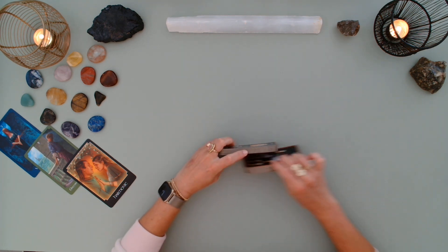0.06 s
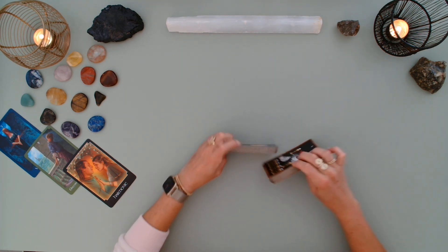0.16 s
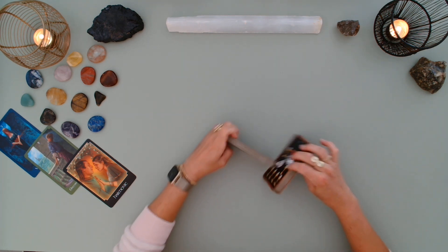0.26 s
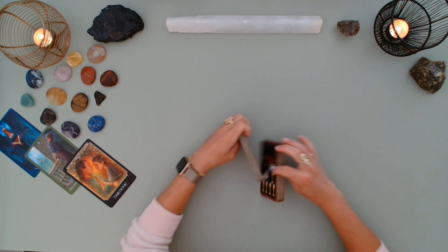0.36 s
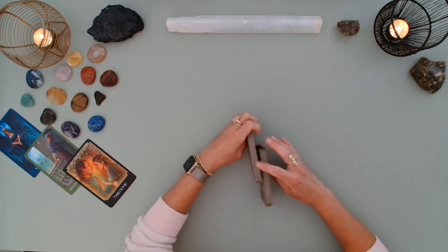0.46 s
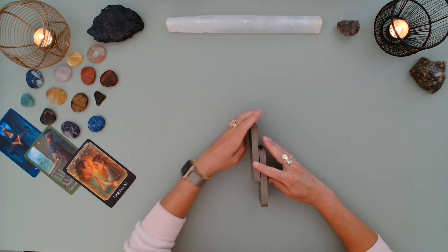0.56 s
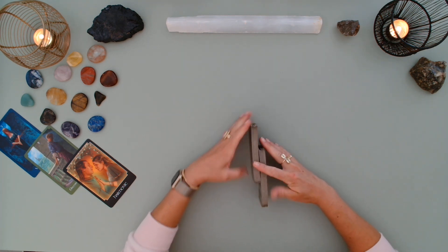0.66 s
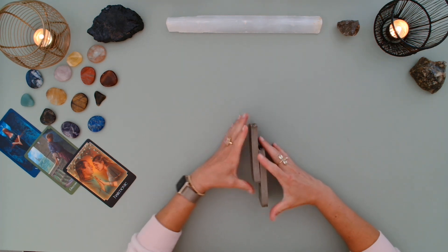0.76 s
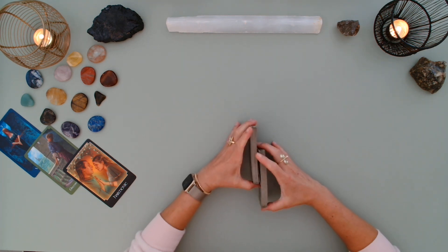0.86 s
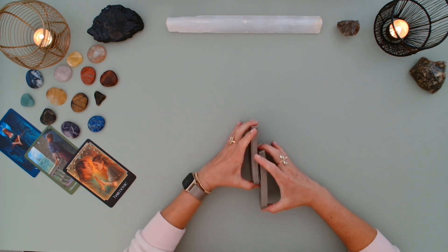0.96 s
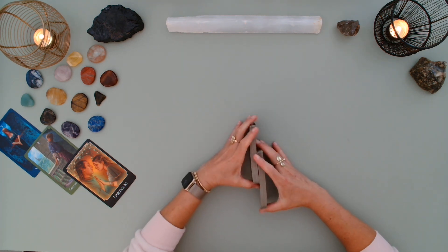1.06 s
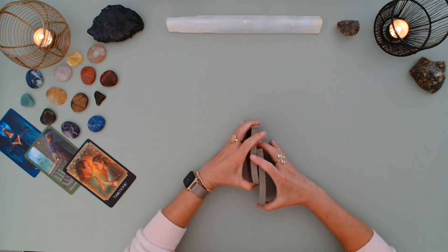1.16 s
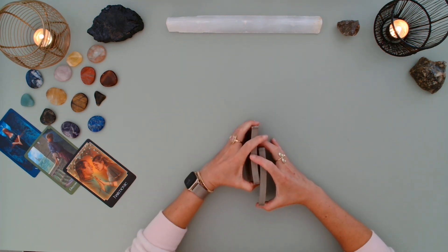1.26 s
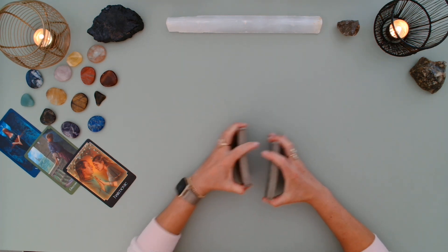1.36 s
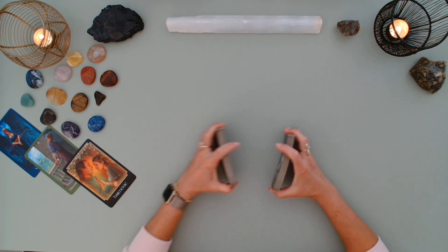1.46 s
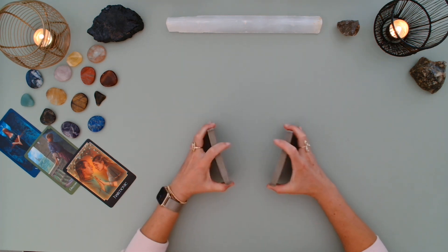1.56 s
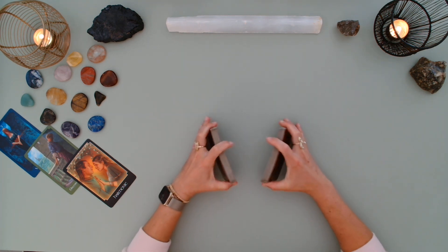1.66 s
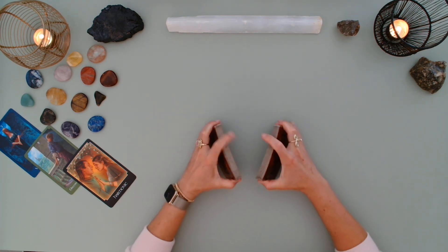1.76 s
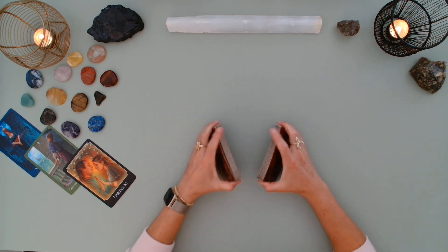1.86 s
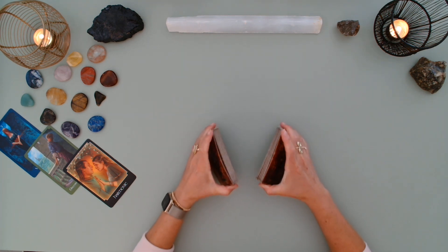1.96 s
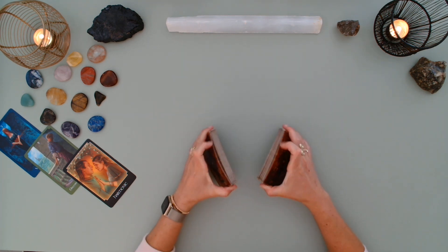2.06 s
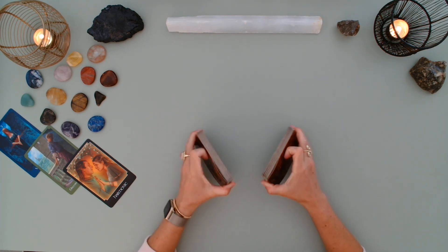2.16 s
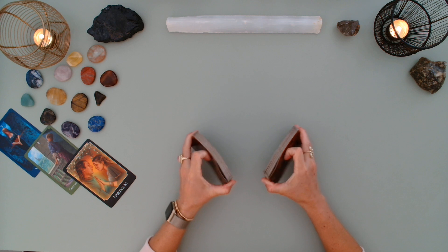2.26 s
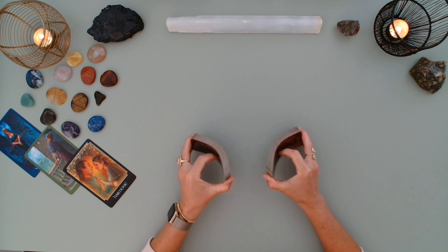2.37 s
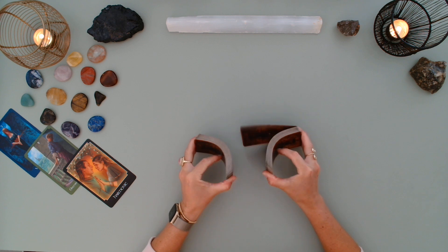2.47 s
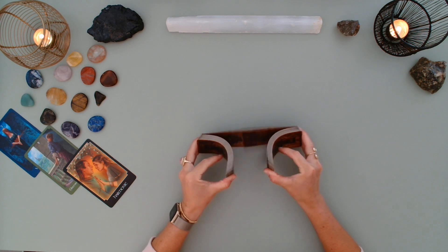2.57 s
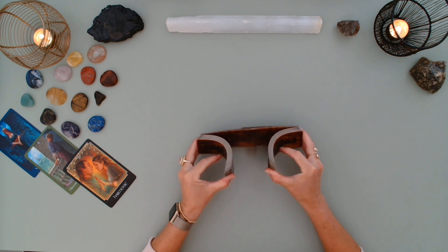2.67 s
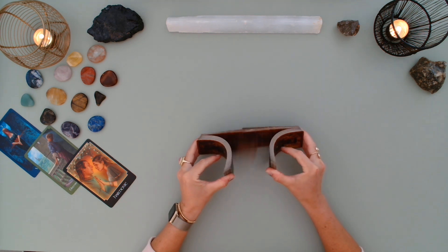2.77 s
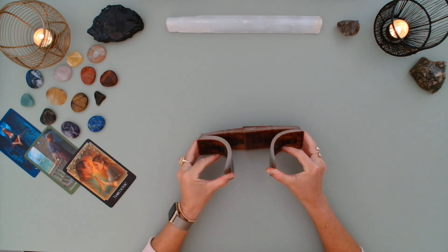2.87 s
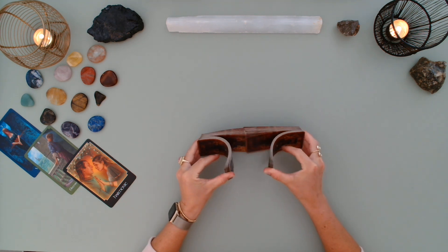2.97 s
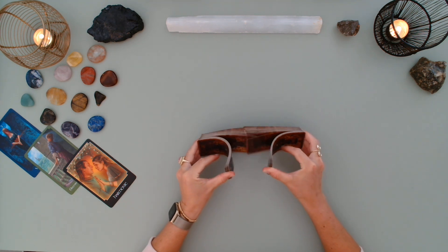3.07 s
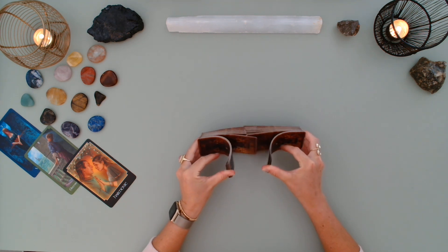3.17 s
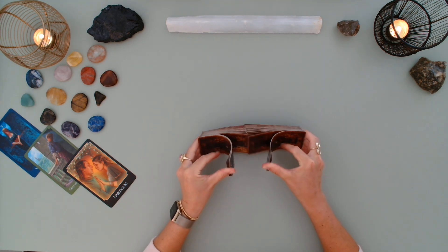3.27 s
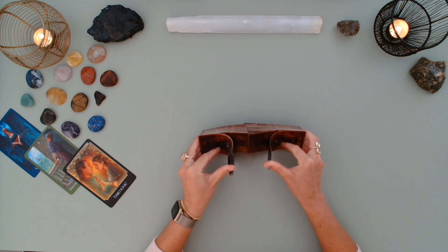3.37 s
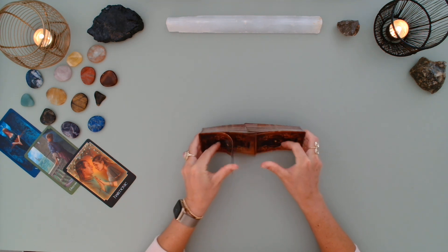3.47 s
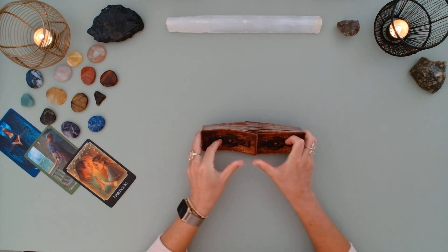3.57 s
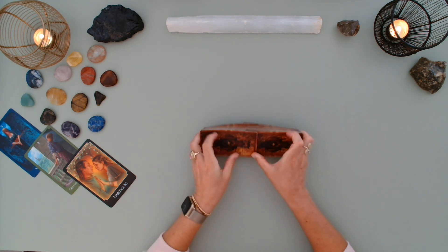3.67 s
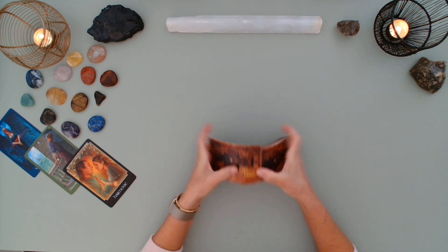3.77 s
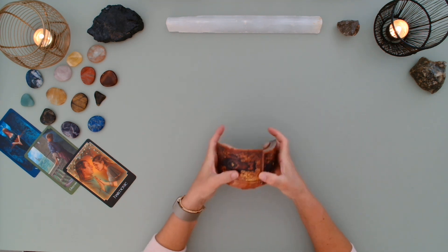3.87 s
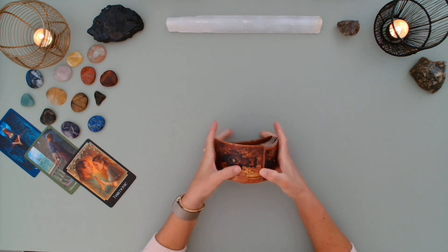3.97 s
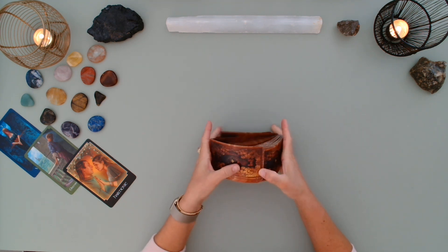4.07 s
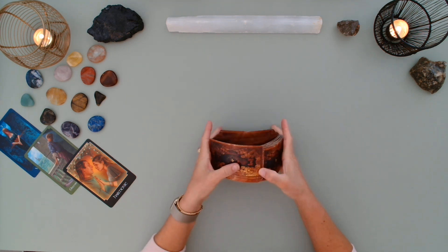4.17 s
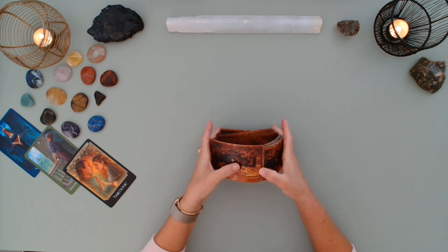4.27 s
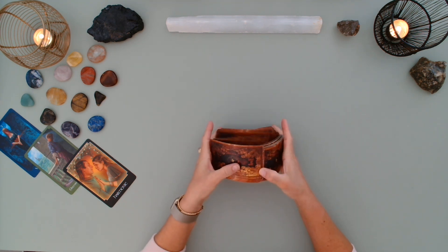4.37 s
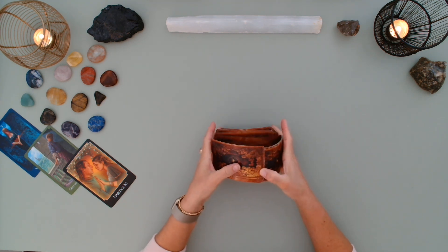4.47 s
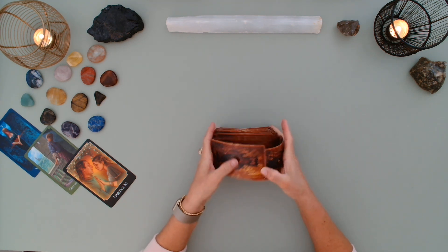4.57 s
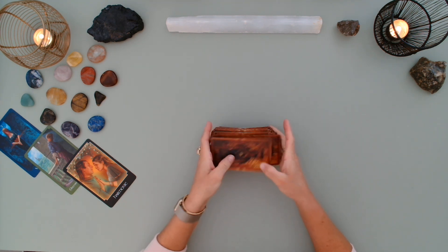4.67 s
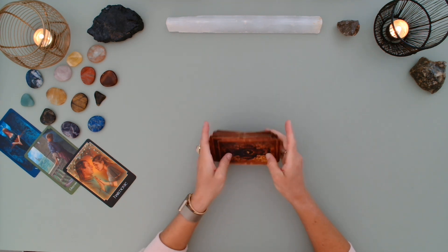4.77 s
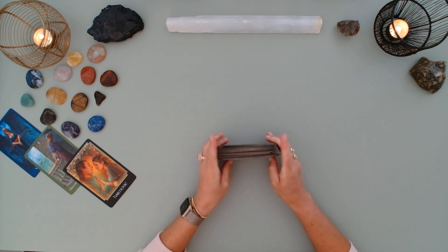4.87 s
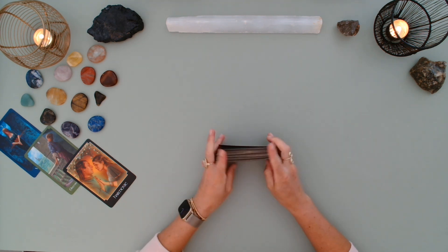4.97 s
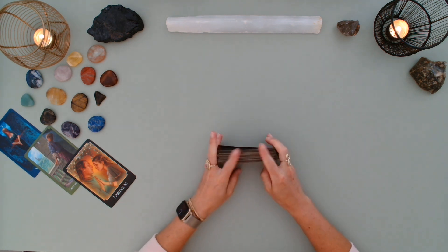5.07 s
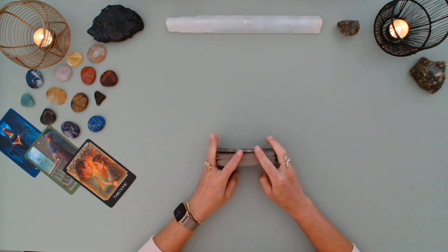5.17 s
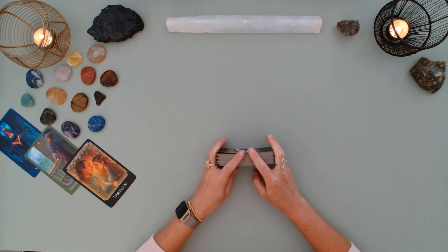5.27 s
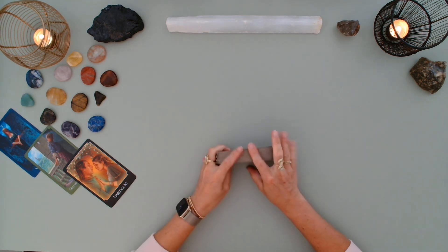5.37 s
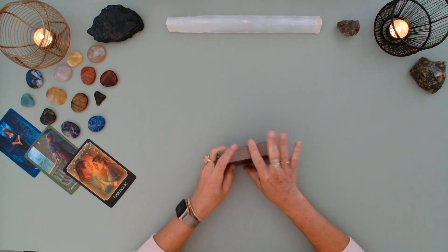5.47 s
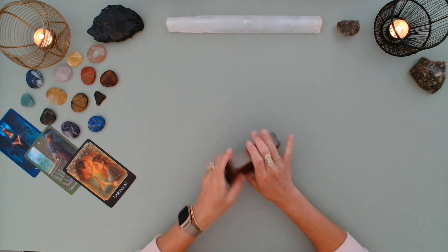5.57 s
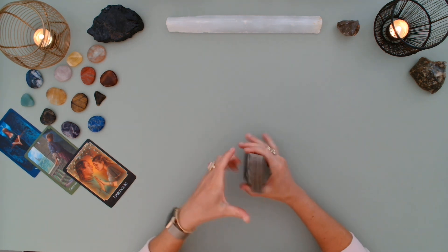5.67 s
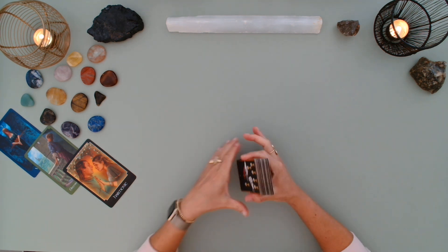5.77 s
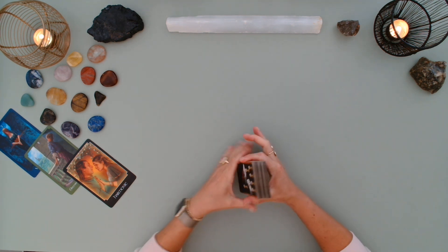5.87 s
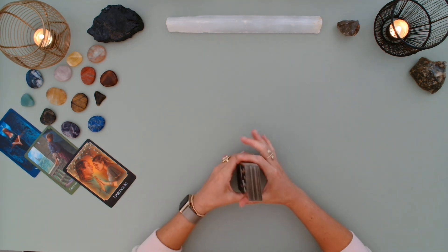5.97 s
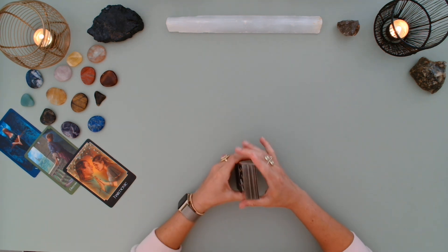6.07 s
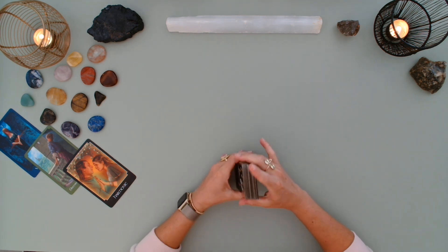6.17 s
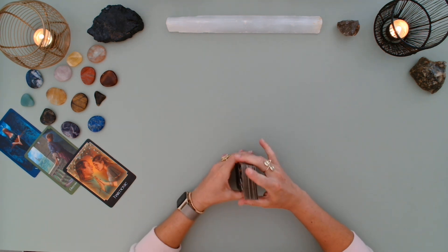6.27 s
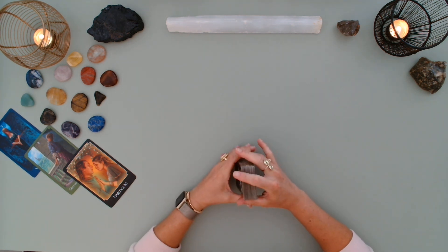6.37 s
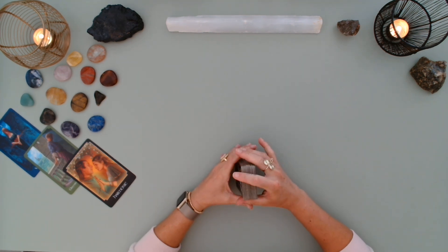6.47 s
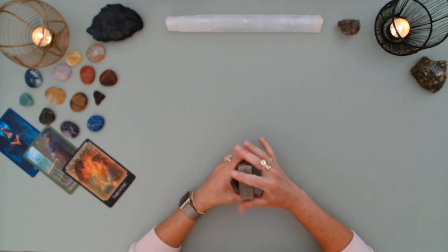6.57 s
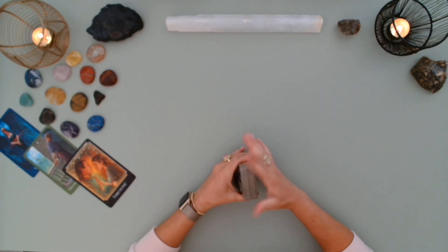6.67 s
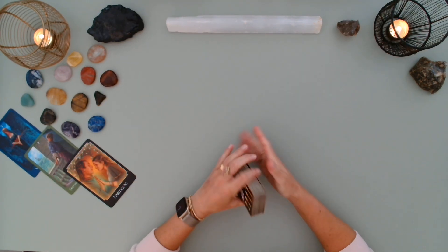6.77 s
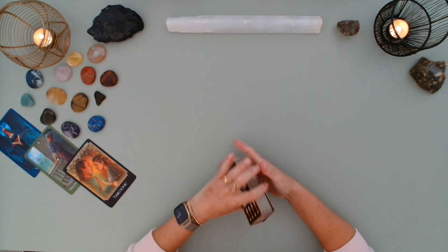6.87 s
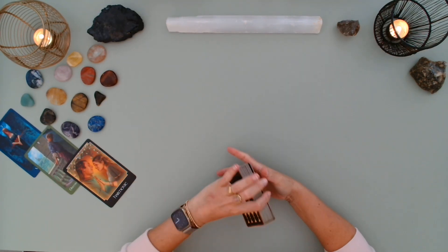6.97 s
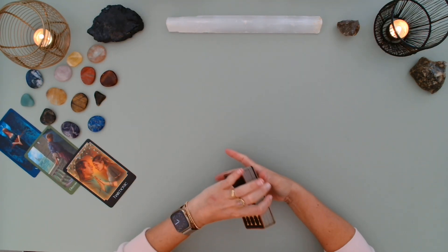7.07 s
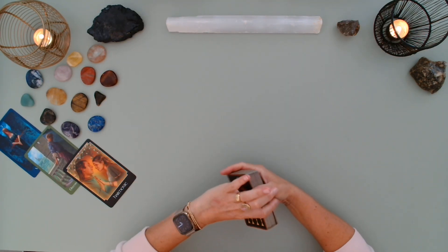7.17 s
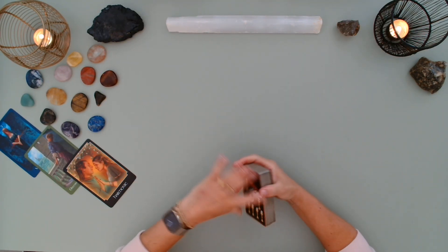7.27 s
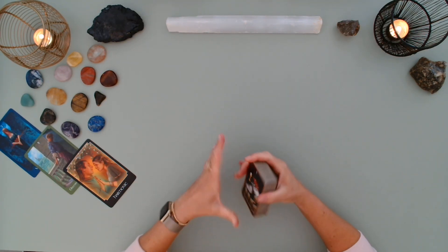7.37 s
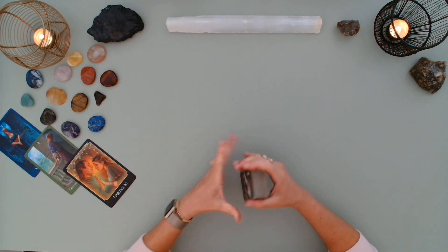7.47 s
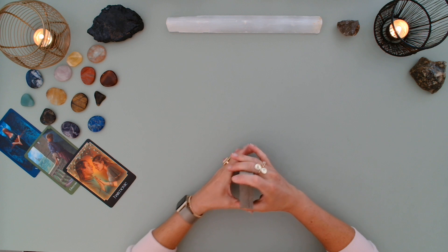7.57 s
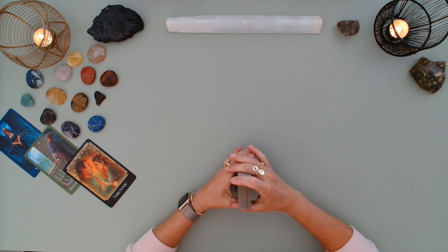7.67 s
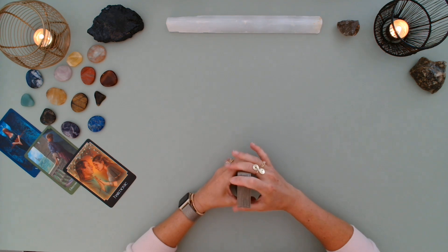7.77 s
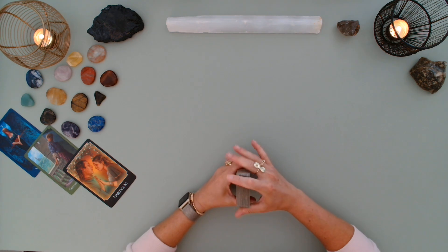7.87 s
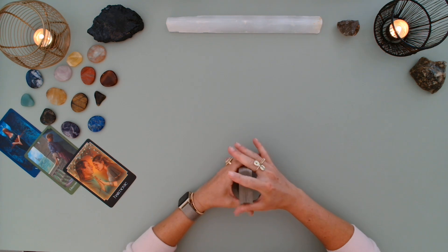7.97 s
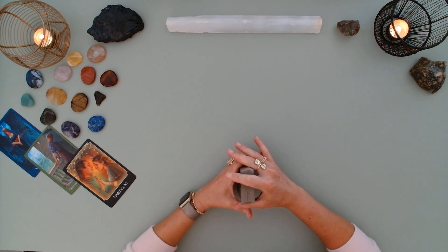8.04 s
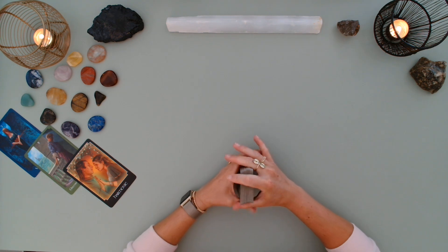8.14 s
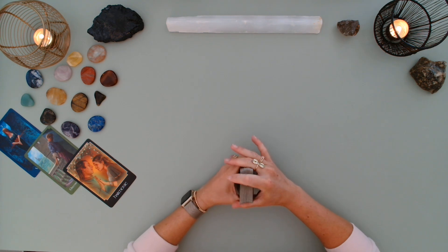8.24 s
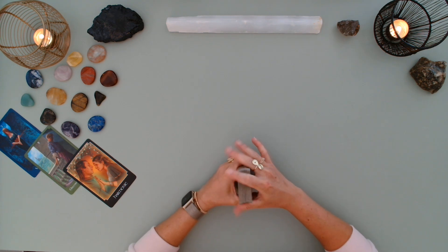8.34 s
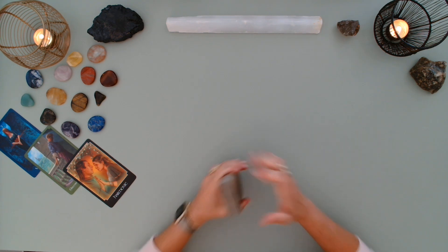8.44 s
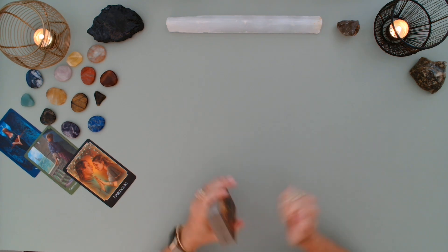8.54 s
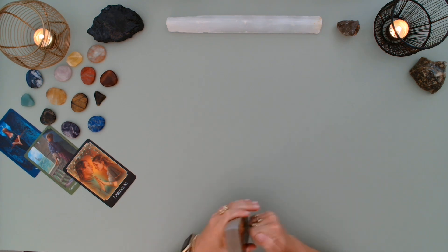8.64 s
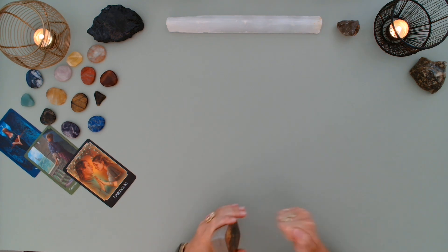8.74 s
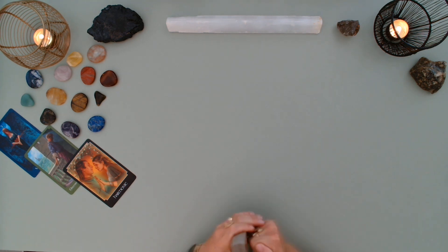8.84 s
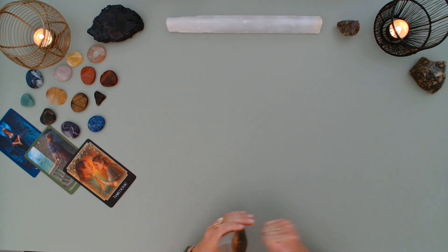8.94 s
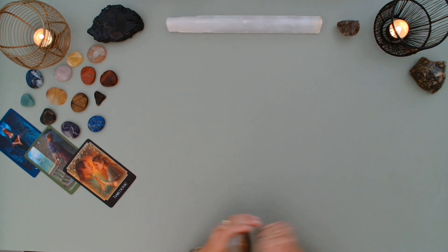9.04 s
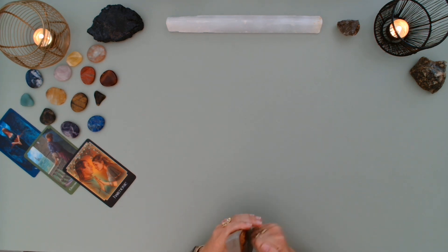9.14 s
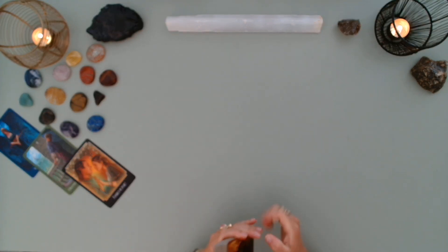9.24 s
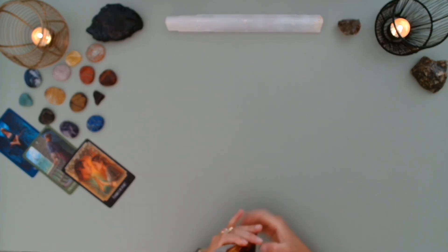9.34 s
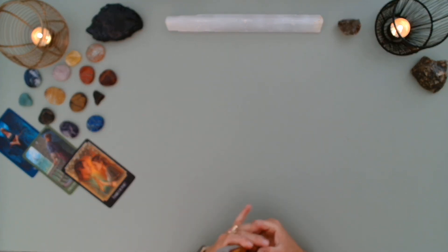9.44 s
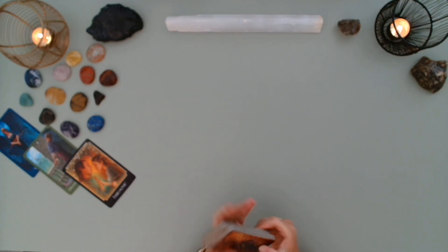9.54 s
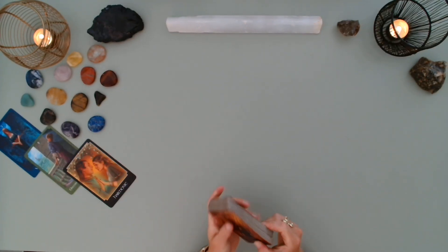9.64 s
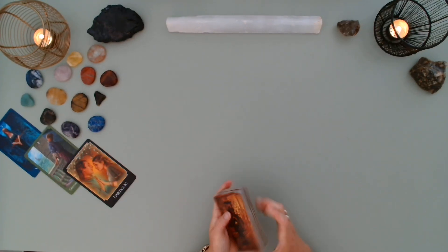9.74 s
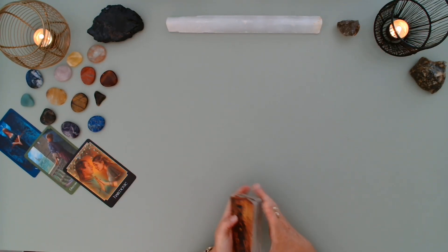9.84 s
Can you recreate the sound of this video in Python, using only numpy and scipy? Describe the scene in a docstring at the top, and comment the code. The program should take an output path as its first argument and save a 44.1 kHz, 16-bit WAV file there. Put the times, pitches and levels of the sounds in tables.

```python
"""A deck of tarot cards is cut on a table in ringing, clacking drops and scraping slides, then riffled: ticks,
cracks and slaps over a flutter. The bridge lets go in a swish and a rush; taps on the edge square the deck.
Three knuckle knocks follow, damped deck rings with cracks and air puffs that overload the microphone;
then a fingertip squeaks. Hits are decaying modes and filtered noise, rubs are trains of tiny slips.
Throughout, a small live room answers over a low rumble, hiss, a hum and a faint wavering whine."""
import sys
import numpy as np
from scipy import signal
from scipy.fft import rfft, irfft, next_fast_len
from scipy.io import wavfile
from scipy.ndimage import map_coordinates

SR = 44100
rng = np.random.default_rng(int(sys.argv[2]) if len(sys.argv) > 2 else 0)


def to_wav(sig):
    """Store sig (one row per channel, or 1-D mono) as 16-bit WAV at the path in sys.argv[1].

    Samples outside -1..1 are clipped; the rate is SR.
    """
    pcm = np.clip(np.atleast_2d(sig), -1, 1) * 32767
    pcm = np.round(pcm).astype(np.int16)
    wavfile.write(sys.argv[1], SR, pcm.T)  # frames by channels


N = 437031
HIT = 8192  # samples in one short sound
HIT_T = np.arange(HIT) / SR
HIT_HZ = np.fft.rfftfreq(HIT, 1 / SR)
TOP_HZ = 16100  # band limit

# All table levels are relative: each layer trims them further.
# packets landing on the table: t/s, table level/dB, table pitch f/Hz, card clack level/dB
LANDINGS = [(0.197, -9.5, 630, -58), (0.248, -12.5, 610, -30), (0.396, -17.5, 630, -39),
            (0.427, -24, 604, -37), (0.472, -24.5, 565, -38.5), (0.554, -19.5, 744, -16.5),
            (0.861, -26, 655, -55), (0.985, -22.5, 587, -27.5), (1.232, -14, 470, -32.5),
            (1.5192, -12.5, 593, -22), (1.531, -5.5, 660, -16.5), (3.939, -28.5, 500, -41.5),
            (4.888, -12.5, 735, -25), (4.921, -10.5, 696, -20), (4.945, -19, 660, -22),
            (4.967, -40, 680, -24.5), (5.024, -29, 570, -33), (5.074, -26.5, 635, -34),
            (5.091, -23.5, 575, -38.5), (5.318, -29.5, 800, -30), (6.147, -23.5, 720, -34.5),
            (6.247, -24, 700, -39.5), (6.264, -19, 670, -27), (6.337, -22, 725, -19.5),
            (6.359, -22.5, 557, -35), (6.381, -32, 710, -27.5), (6.639, -14.5, 600, -39),
            (6.66, -12.5, 570, -43), (7.735, -28.5, 518, -44.5), (7.944, -22, 480, -33.5),
            (7.957, -17, 730, -23.5), (7.976, -19.5, 620, -30.5), (8.196, -31, 520, -57.5),
            (8.217, -32.5, 520, -59), (8.324, -28.5, 470, -52.5)]
# a loosely held packet drops card by card:
# t of the hardest/s, rise/s, fall/s, table level/dB, table pitch f/Hz, card clack level/dB
TUMBLES = [(0.245, .1, .085, -10.5, 650, -26.5), (4.925, .03, 0.05, -15, 740, -29)]
# low thuds under the heaviest landings and under two of the knuckle raps: t/s, level/dB
THUDS = [(.248, -24.5), (1.529, -19.5), (6.265, -27.5), (7.954, -30), (8.614, -30), (9.075, -37.5)]
# ringing modes of the table top: f/Hz, level/dB, t60/s
TABLE_MODES = [(174, 19.5, 0.03), (282.3, 3.5, 0.11), (319.3, -2, 0.071), (518, -12, 0.068),
               (604.4, -2.5, 0.054), (660, -9.5, 0.047), (797, -3.5, 0.049), (919, -13.5, 0.11),
               (1052, -4, 0.06), (1268, -6, 0.064)]
# ringing modes of the low thuds: f/Hz, level/dB, t60/s
THUD_MODES = [(28, -10, 0.94), (73, -1, 0.24), (117, -14, 0.5), (153, -7, 0.13), (210, 3.5, 0.19)]
# packets sliding on the table and on each other: start t/s, length/s, scrape level/dB, swish level/dB
SLIDES = [(0.0, 0.13, -41, -42.5), (0.173, 0.051, -32, -66), (0.325, 0.049, -31.5, -42),
          (0.83, 0.017, -37.5, -56.5), (0.982, 0.15, -39, -63.5), (1.4, 0.095, -50, -55.5),
          (1.646, 0.2, -44, -62.5), (1.953, .25, -57.5, -71), (5.027, 0.17, -39.5, -62.5),
          (5.304, 0.066, -41.5, -58), (5.552, 0.022, -44.5, -55.5), (6.669, 0.044, -38, -58.5),
          (6.827, 0.015, -49, -53.5), (8.246, 0.12, -50, -66), (9.384, 0.22, -59.5, -71)]
# the thumbs let the bent cards run: t/s, level/dB
RIFFLE_RUN = [(2.43, -55.5), (2.501, -38.5), (2.779, -40), (2.95, -32.5), (3.16, -35), (3.46, -37.5),
              (3.6, -46.5), (3.781, -52)]
# the hardest snaps, off the thumbs and then out of the bridge: t/s, level/dB, brightness/dB
SNAPS = [(2.4389, -34, -7), (2.495, -30.5, -7.5), (2.528, -34, 6.5), (2.568, -32, 2), (2.647, -34.5, -3.5),
         (2.715, -33, -4), (2.749, -29.5, -5), (2.782, -23.5, -4), (2.834, -22.5, -0.5), (2.845, -23, -1),
         (2.8555, -21, -2.5), (2.891, -28, -2), (2.94, -26, -5.5), (2.96, -27, -5), (2.972, -26.5, 8),
         (3.027, -17.5, -3.5), (3.1184, -13.5, 5.5), (3.1257, -17.5, 2), (3.16, -25, 0.5),
         (3.196, -19.5, 0), (3.231, -27.5, -0.5), (3.293, -23, 1.5), (3.3, -25, -9.5), (3.334, -26, 3),
         (3.4002, -23.5, 5.5), (3.438, -30, 6), (3.447, -24, 3.5), (3.756, -35.5, -3), (4.119, -37, 2),
         (4.173, -30.5, 0.5), (4.199, -34.5, 5), (4.244, -41.5, 9), (4.261, -36.5, -9.5),
         (4.324, -33.5, -3), (4.37, -35.5, 3), (4.403, -25.5, 2.5), (4.466, -30, -3), (4.488, -31, -7),
         (4.544, -36.5, 0.5), (4.587, -37, 4), (4.612, -33.5, -0.5), (4.646, -34, -2.5),
         (4.674, -38.5, 8.5)]
# bright edge ticks, some alone and some with a packet's landing: t/s, level/dB
EDGE_TICKS = [(0.098, -43), (0.5507, -39.5), (0.837, -43.5), (1.043, -51), (1.113, -49), (1.529, -49),
              (3.84, -50.5), (5.32, -45.5), (6.101, -49.5), (7.7, -45.5), (8.164, -56.5), (8.356, -55),
              (9.422, -56.5), (9.5, -51.5)]
# fingertip squeak partials: f/Hz, level/dB
SQUEAK_PARTIALS = [(900, -40), (1800, -55), (2780, -50)]
# knuckle on the deck: t/s, ring level/dB, deck pitch f/Hz, crack level/dB, air puff level/dB
RAPS = [(8.6149, -16.5, 630, -15, -11.5), (8.8536, -13.5, 965, -9.5, -10.5),
        (9.0748, -10.5, 810, -12.5, -9)]
# modes of the deck held in the hand: multiple of its pitch, level/dB, t60/s
DECK_MODES = [(0.699, -12.5, 0.023), (1, 5.5, .018), (1.351, -5.5, .012)]
# colour of a packet's clack: f/Hz, level/dB
CLACK_COLOUR = [(300, -32.5), (900, 1), (1350, 3.5), (1700, 2), (2080, -1.5), (2450, -6.5), (3000, -11),
                (3600, -16), (4400, -25.5), (5600, -29.5), (16000, -60)]
# colour of a card slapping the pile: f/Hz, level/dB
SLAP_COLOUR = [(60, -5.5), (170, -5.5), (280, -2.5), (400, -2), (560, 0.5), (1000, -2.5), (1400, -5.5),
               (2200, -25), (5000, -48)]
# colour of a card's sharp crack: f/Hz, level/dB
CRACK_COLOUR = [(600, -29), (1300, -5.5), (2000, 2), (2600, -0.5), (3300, -6), (4300, -19.5), (6000, -16),
                (16000, -52)]
# colour of a ticking card edge: f/Hz, level/dB
EDGE_COLOUR = [(1500, -28.5), (4000, -9.5), (5200, -6), (6500, -3.5), (8100, 0), (9200, -7), (10600, -5.5),
               (11600, -4.5), (13000, -7.5), (15500, -13), (18000, -25)]
# colour of the knuckle's crack: f/Hz, level/dB
RAP_COLOUR = [(200, -8.5), (450, -12), (650, 5.5), (1200, 2.5), (1650, -0.5), (2050, 2.5), (2550, -12.5),
              (3400, -18), (4500, -19.5), (6000, -32), (10000, -28), (15500, -45.5)]
# colour of a packet scraping the table: f/Hz, level/dB
SCRAPE_COLOUR = [(80, -25), (170, -0.5), (310, -5), (420, -3), (620, -9.5), (800, -3.5), (1080, -11),
                 (1400, -9), (1950, -14), (2800, -20.5), (4200, -27.5), (9000, -54.5)]
# colour of cards fluttering past each other: f/Hz, level/dB
FLUTTER_COLOUR = [(60, 0), (160, 1), (300, 5.5), (550, -2.5), (1000, -11.5), (2050, -10), (2800, -13.5),
                  (4200, -22), (9000, -43)]
# colour of swishing card faces: f/Hz, level/dB
SWISH_COLOUR = [(1500, -5.5), (4000, -9), (6000, -5.5), (8100, -1), (10000, -3), (12000, -5),
                (15500, -12.5), (18000, -18)]
# colour of the low rumble, and of stirred air: f/Hz, level/dB
RUMBLE_COLOUR = [(8, 10.5), (20, -10), (35, -4.5), (52, -5), (64, -20.5), (80, -24), (140, -40),
                 (300, -56.5)]
# colour of the steady hiss: f/Hz, level/dB
HISS_COLOUR = [(60, -13), (130, 0.5), (230, 6), (400, -5.5), (900, -4.5), (1500, -12.5), (3000, -15),
               (7000, -18.5), (15000, -20.5), (15600, -15), (16000, -45.5)]
# lines of the thin whine: f/Hz, level/dB
WHINE_LINES = [(5010, -70.5), (6250, -74.5)]
# reverberation time of the room: f/Hz, t60/s
ROOM_DECAY = [(100, .5), (300, 0.56), (800, 0.41), (2000, 0.39), (4000, 0.42), (8000, 0.093), (15000, 0.26)]
# tone of the room's answer: f/Hz, level/dB
ROOM_TONE = [(100, 4.5), (300, 0.5), (2100, -0.5), (2800, -0.5), (4000, -1), (8000, 1), (15000, -2.5)]

TICK_UNDER_CLACK_DB = 31  # edges tick with the clack
TUMBLE_FADE_DB, CLACK_FADE_DB = 20.5, 23.5  # how much softer the first and last cards land, before scatter
HARD_CLACK_DB, CRACK_GROWS = -15.5, 1.0  # hard landings crack more: extra dB per dB of clack
LEAD_S, LEAD_DB = 0.009, -21  # a corner of the packet touches first
SOFT_ATTACK_S, SOFTNESS_DB = 0.0003, 17  # the attack doubles for each such step of table over clack
SLIDE_ATTACK_S, SLIDE_RELEASE_S = 0.086, 0.11  # time per 20 dB of rise or fall
SLIDE_SAG_DB_PER_S = 5.5
RIFFLE_SWISH_DB = -7  # card faces against the riffle strength
BRIDGE_START_S, BRIDGE_LENGTH_S = 4.07, 0.585
BRIDGE_ATTACK_S, BRIDGE_RELEASE_S = 0.17, 0.13  # time per 20 dB
BRIDGE_FLUTTER_DB, BRIDGE_SWISH_DB, BRIDGE_BUILD_S = -38.5, -37, 0.071
FACES_LEAD_S = 0.013  # the faces slide before the first card slips
RUSH_DB, RUSH_S = 13, 0.026  # swell of the last cards


def table_knocks(focus_db=13):
    """A packet lands corner first: table modes ring, it clacks and cracks, edges tick; low thuds add weight."""
    out = np.zeros(N)
    clack, crack, edge = causal(CLACK_COLOUR), causal(CRACK_COLOUR), causal(EDGE_COLOUR)
    corners = [(s - LEAD_S, table_db + LEAD_DB, hz, clack_db + LEAD_DB)
               for s, table_db, hz, clack_db in LANDINGS]
    for s, table_db, pitch_hz, clack_db in LANDINGS + corners + tumbling_cards():
        top = np.zeros(HIT)
        for hz, db, t60 in TABLE_MODES:
            # the spot and the softness of the landing favour the modes near its pitch
            octaves_off = np.log2(hz / pitch_hz)
            size = amp(db - focus_db * octaves_off ** 2 + rng.normal(0, 3.4))
            top += size * rng.choice([-1, 1]) * ring(hz * (1 + rng.normal(0, 0.017)), t60)
        attack = SOFT_ATTACK_S * 2 ** ((table_db - clack_db) / SOFTNESS_DB)
        top = amp(table_db - 3.5) * burst(top * (1 - np.exp(-HIT_T / attack)))
        cards = amp(clack_db) * contact(clack, t60=0.05, tail_db=-15.0, tail_t60=0.097)
        crack_db = clack_db - 9.5 + CRACK_GROWS * (clack_db - HARD_CLACK_DB)
        snap = amp(crack_db) * contact(crack, t60=0.03, tail_db=-13.5, tail_t60=0.061)
        tick_db = clack_db - TICK_UNDER_CLACK_DB
        tick = amp(tick_db) * contact(edge, t60=0.016, tail_db=-16.0, tail_t60=0.081)
        add(out, s, top + cards + snap + tick)
    for s, db in THUDS:
        thud = sum(amp(level) * rng.choice([-1, 1]) * ring(hz, t60) for hz, level, t60 in THUD_MODES)
        add(out, s, amp(db) * burst(thud))
    return out


def tumbling_cards(count=13, scatter=0.3, spread_db=2):
    """Cards land one after another, hardest in the middle of the drop: rows like LANDINGS."""
    rows = []
    for s, rise, fall, table_db, pitch_hz, clack_db in TUMBLES:
        u = np.linspace(-1, 1, count) + scatter * rng.uniform(-2, 2, count) / count
        luck = spread_db * rng.standard_normal(count)
        when = s + u * np.where(u < 0, rise, fall)
        table = table_db - TUMBLE_FADE_DB * u ** 2 + luck
        clack = clack_db - CLACK_FADE_DB * u ** 2 + luck
        rows += zip(when, table, np.full(count, pitch_hz), clack)
    return rows


def slides():
    """Packets dragged over the table scrape and card faces swish; each push sags in level as it goes."""
    scrape, swish = np.zeros(N), np.zeros(N)
    for s, length, scrape_db, swish_db in SLIDES:
        push_db = envelope(s, length, SLIDE_ATTACK_S, SLIDE_RELEASE_S, SLIDE_SAG_DB_PER_S)
        push = amp(push_db.clip(-200))
        scrape += amp(scrape_db) * push
        swish += amp(swish_db) * push
    body = amp(-2.5) * scrape * friction(SCRAPE_COLOUR, rate=1500, spread_db=5, smooth=0.6)
    return body + swish * friction(SWISH_COLOUR, rate=580, spread_db=1.5, smooth=1.3)


def riffle():
    """The two halves run off the thumbs and interleave: light snaps over rubbing cards."""
    s, db = np.transpose(RIFFLE_RUN)
    strength_db = np.interp(np.arange(N) / SR, s, db)
    strength_db += envelope(s[0], s[-1] - s[0], attack=0.015, release=1.0)
    slips = small_snaps(s[0], s[-1], strength_db, over_db=-4.0, bright_db=-4, count=60)
    bed = running_cards(strength_db - 1.1, strength_db + RIFFLE_SWISH_DB)
    return bed + card_snaps(slips, slap_tail_db=-2.5, crack_db=-3.0)


def bridge():
    """The arched deck springs flat: faces swish first, the flutter builds, the last cards rush home."""
    t = np.arange(N) / SR - BRIDGE_START_S
    flow_db = envelope(BRIDGE_START_S, BRIDGE_LENGTH_S, BRIDGE_ATTACK_S, BRIDGE_RELEASE_S)
    build_db = -8 * np.exp(-np.maximum(t, 0) / BRIDGE_BUILD_S)
    flutter_db = BRIDGE_FLUTTER_DB + flow_db + build_db
    faces_db = envelope(BRIDGE_START_S - FACES_LEAD_S, BRIDGE_LENGTH_S + FACES_LEAD_S,
                        BRIDGE_ATTACK_S, BRIDGE_RELEASE_S)
    rush_db = RUSH_DB * np.exp(-((t - BRIDGE_LENGTH_S) / RUSH_S + 1) ** 2)
    slips = small_snaps(BRIDGE_START_S, BRIDGE_START_S + BRIDGE_LENGTH_S, flutter_db,
                        over_db=-1, bright_db=-0.5, count=44)
    bed = running_cards(flutter_db - 4.0, BRIDGE_SWISH_DB + faces_db + rush_db)
    return bed + card_snaps(slips, slap_tail_db=-12, crack_db=-10.5, bend_delay=0.00046)


def card_snaps(rows, slap_tail_db=5, crack_db=-1.5, bend_delay=0.00104):
    """Each released card ticks, cracks and slaps the pile; bright ones tick more and slap less."""
    out = np.zeros(N)
    slap, crack, edge = causal(SLAP_COLOUR), causal(CRACK_COLOUR), causal(EDGE_COLOUR)
    for s, db, bright_db in rows:
        # bending waves are slower at low pitch, so the slap chirps downward
        delay = bend_delay * rng.uniform(0.3, 1.567)
        chirp = np.exp(-4j * np.pi * delay * np.sqrt(1000 * HIT_HZ))
        slap_hit = contact(slap * chirp, t60=0.004, tail_db=slap_tail_db, tail_t60=0.034)
        crack_hit = contact(crack, t60=0.0031, tail_db=-8.5, tail_t60=0.025)
        edge_hit = contact(edge, t60=0.0019, tail_db=-11, tail_t60=0.013)
        add(out, s, amp(db - bright_db + 0.3) * slap_hit)
        add(out, s, amp(db + crack_db) * crack_hit)
        add(out, s, amp(db + bright_db - 1.46) * edge_hit)
    return out


def small_snaps(start, end, strength_db, over_db, bright_db, count, spread_db=1.5):
    """Lighter cards slip at uneven intervals, as hard as the cards run: rows like SNAPS."""
    when = start + (end - start) * (np.arange(count) + rng.random(count)) / count
    luck = np.clip(rng.standard_normal((2, count)), -2, 1.5)
    level = strength_db[(when * SR).astype(int)] + over_db
    return np.transpose([when, level + spread_db * luck[0], bright_db + 4.2 * luck[1]])


def running_cards(flutter_db, swish_db):
    """Between the snaps the card faces rub and flutter; the fanning cards stir the air."""
    flutter, swish = amp(np.maximum([flutter_db, swish_db], -200))
    body = amp(-1.0) * flutter * friction(FLUTTER_COLOUR, rate=400, spread_db=8.0, smooth=0.98)
    grain = friction(SWISH_COLOUR, rate=2500, spread_db=5, smooth=0.7)
    faces = amp(-7.0 + 3.7 * wobble(51)) * swish * grain
    draught = amp(8.0) * flutter * coloured(rng.standard_normal(N), RUMBLE_COLOUR)
    return body + faces + draught


def knuckle_raps(puff_hz=9, puff_t60=0.44, puff_rise=0.0014):
    """The hand damps the deck at once; air squeezed from between the cards pushes on the microphone."""
    out, puffs = np.zeros(N), np.zeros(N)
    crack, edge = causal(RAP_COLOUR), causal(EDGE_COLOUR)
    swing = np.cos(2 * np.pi * puff_hz * HIT_T)
    push = swing * (1 - np.exp(-HIT_T / puff_rise)) * amp(-60 * HIT_T / puff_t60)
    settle = np.cos(np.linspace(0, np.pi / 2, HIT))  # brings the puff to zero at its end
    for s, ring_db, pitch_hz, crack_db, puff_db in RAPS:
        deck = sum(amp(db) * ring(k * pitch_hz, t60) for k, db, t60 in DECK_MODES)
        # one clean blow, with loose cards chattering and their edges ticking
        chatter = amp(-1.5) * contact(crack, t60=0.013, tail_db=-13, tail_t60=0.033)
        edges = amp(-30.5) * contact(edge, t60=0.0059, tail_db=-4.0, tail_t60=0.1)
        blow = burst(irfft(crack)) + chatter + edges
        add(out, s, amp(ring_db) * burst(deck) + amp(crack_db) * blow)
        add(puffs, s, amp(puff_db) * push * settle)
    return out, puffs


def edge_ticks():
    """Bright ticks of card edges, alone or with a landing: a crack and a higher edge tick together."""
    out, crack, edge = np.zeros(N), causal(CRACK_COLOUR), causal(EDGE_COLOUR)
    for s, db in EDGE_TICKS:
        add(out, s, amp(db + 2.5) * contact(crack, t60=0.02, tail_db=-11.5, tail_t60=0.062))
        add(out, s, amp(db - 0.5) * contact(edge, t60=0.018, tail_db=-11, tail_t60=0.12))
    return out


def squeak(s=9.592, length=0.035, fall=0.13):
    """A fingertip sticks and slips on a card: rough partials, sinking in pitch as it stops."""
    u = np.linspace(0, 1, int(length * SR))
    speed = 1 + fall * (0.5 - u) + 0.69 * rng.standard_normal(len(u))
    turns = np.cumsum(speed) / SR
    tone = sum(amp(db) * np.sin(2 * np.pi * hz * turns) for hz, db in SQUEAK_PARTIALS)
    out = np.zeros(N)
    add(out, s, np.sin(np.pi * u) ** 2 * tone)
    return out


def room(x, count=4):
    """The diffuse answer of the walls: decaying noise tails, taking turns every fifth of a second."""
    hz, t, z = signal.stft(rng.standard_normal((count, SR * 3 // 4)), SR, nperseg=256)
    decay = amp(along(ROOM_TONE, hz)[:, None] - 60 * t / along(ROOM_DECAY, hz)[:, None])
    build_up = 1 - np.exp(-t / 0.009)
    tails = signal.istft(z * decay * build_up, SR, nperseg=256)[1] / np.sqrt(SR / 30)
    turn = (np.arange(N) // (SR // 5)) % count
    return sum(signal.fftconvolve(x * (turn == k), tails[k])[:N] for k in range(count))


def background():
    """Shaped-noise rumble and hiss, a mains hum, and a thin whine whose lines waver together and jitter apart."""
    rumble = amp(-34.0) * coloured(rng.standard_normal(N), RUMBLE_COLOUR)
    hiss = amp(-58.5) * coloured(rng.standard_normal(N), HISS_COLOUR)
    hum = amp(-58.5) * unit(np.sin(2 * np.pi * 100 * np.arange(N) / SR))
    drift = 1 + 0.012 * wobble(49) + 0.024 * wobble(4.1)
    whine = np.zeros(N)
    for hz, db in WHINE_LINES:
        line_hz = hz * (drift + 0.018 * wobble(700))
        whine += amp(db) * unit(np.sin(2 * np.pi * np.cumsum(line_hz) / SR))
    return rumble + hiss + hum + whine


def amp(db):
    """Decibels to gain."""
    return 10 ** (np.asarray(db) / 20)


def unit(x):
    """Scale to rms 1."""
    return x / np.sqrt(np.mean(x ** 2) + 1e-20)


def burst(x):
    """Scale a short sound to the energy of rms 1 over 10 ms."""
    return x / np.sqrt(np.sum(x ** 2) / (SR / 100) + 1e-20)


def along(points, hz):
    """Read (f/Hz, value) points on a log frequency axis."""
    f, v = np.transpose(points)
    return np.interp(np.log(hz + 1), np.log(f + 1), v)


def wobble(rate):
    """A smooth random curve, rate knots a second."""
    knots = rng.standard_normal(int(N * rate / SR) + 4)
    return map_coordinates(knots, [np.arange(N) * rate / SR])


def coloured(x, spectrum):
    """Filter x through a colour table, at rms 1."""
    m = next_fast_len(N + HIT)
    gain = amp(along(spectrum, np.fft.rfftfreq(m, 1 / SR)))
    return unit(irfft(rfft(x, m) * gain, m)[:N])


def causal(spectrum):
    """Minimum-phase response of a colour table: its energy comes as early as it can."""
    cepstrum = irfft(np.log(amp(along(spectrum, HIT_HZ))))
    cepstrum[1:HIT // 2] *= 2
    cepstrum[HIT // 2 + 1:] = 0
    return np.exp(rfft(cepstrum))


def contact(response, t60, tail_db, tail_t60):
    """A rough contact and its longer after-rattle, heard through a response."""
    decay = amp(-60 * HIT_T / t60) + amp(tail_db - 60 * HIT_T / tail_t60)
    force = rng.standard_normal(HIT) * decay
    return burst(irfft(rfft(force) * response))


def ring(hz, t60):
    """One damped mode."""
    return np.sin(2 * np.pi * hz * HIT_T) * amp(-60 * HIT_T / t60)


def add(track, s, sound):
    """Mix a sound in at time s."""
    i = max(round(s * SR), 0)
    track[i:i + len(sound)] += sound[:N - i]


def friction(spectrum, rate, spread_db, smooth):
    """Many tiny slips of uneven size, rate a second, over a smooth rub."""
    struck = rng.random(N) < rate / SR
    size = amp(spread_db * np.clip(rng.standard_normal(N), -2, 2))
    slips = struck * rng.choice([-1, 1], N) * size
    return coloured(unit(slips) + smooth * rng.standard_normal(N), spectrum)


def envelope(start, length, attack, release, sag_db=0):
    """Level in dB: a rise up to start, a hold sagging by sag_db a second, a fall; 20 dB per attack or release."""
    t = np.arange(N) / SR - start
    slopes = np.maximum(-t, 0) / attack + np.maximum(t - length, 0) / release
    return -20 * slopes - sag_db * np.clip(t, 0, length)


def scene():
    """The nearer a sound is to the microphone, the less of the room it carries."""
    on_table = table_knocks() + slides()
    in_hands = riffle() + bridge() + card_snaps(SNAPS) + edge_ticks() + squeak()
    raps, puffs = knuckle_raps()
    walls = room(amp(-5.5) * on_table + amp(-8.5) * in_hands + amp(-13) * raps)
    return (on_table + in_hands + raps + puffs + walls + background())[None]


def record(dry):
    """Peaks beyond full scale clip; then a steep low-pass sets the band limit."""
    m = next_fast_len(N + HIT)
    low_pass = 1 / (1 + (np.fft.rfftfreq(m, 1 / SR) / TOP_HZ) ** 90)
    return irfft(rfft(np.clip(dry, -1, 1), m) * low_pass, m)[..., :N]


dry = scene()
out = record(dry)
to_wav(out)
```